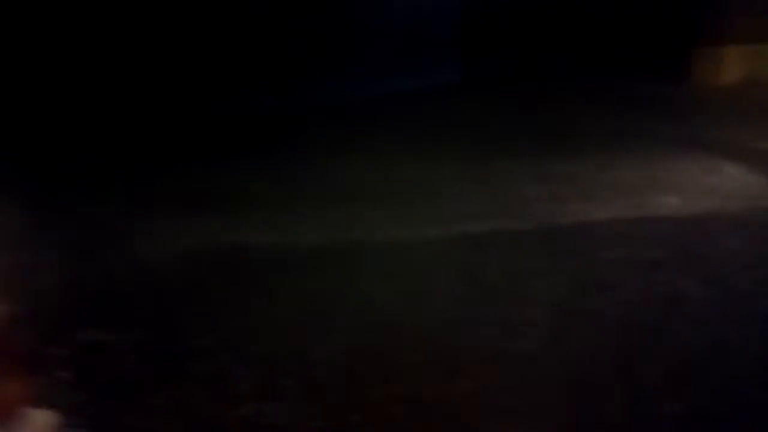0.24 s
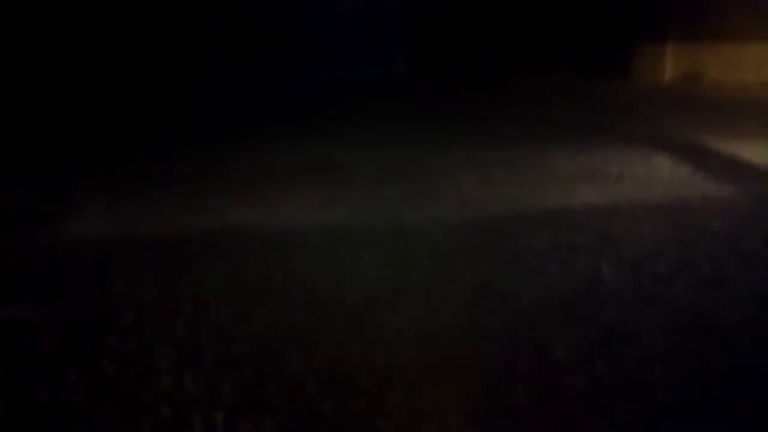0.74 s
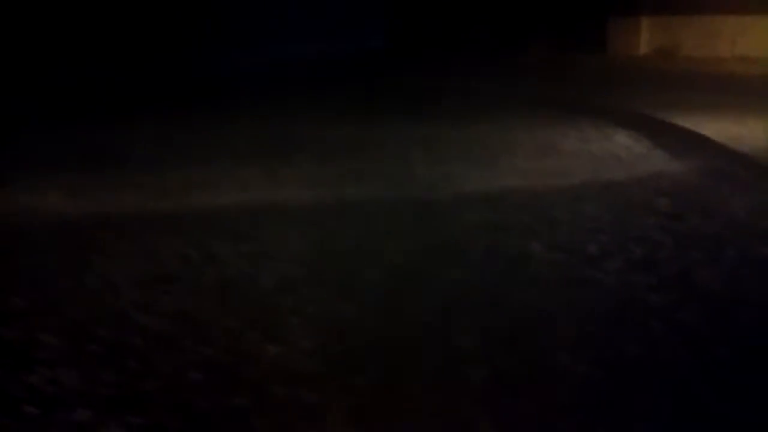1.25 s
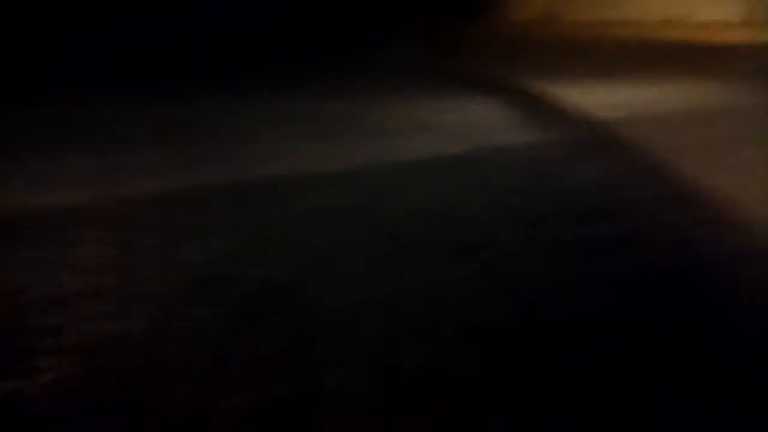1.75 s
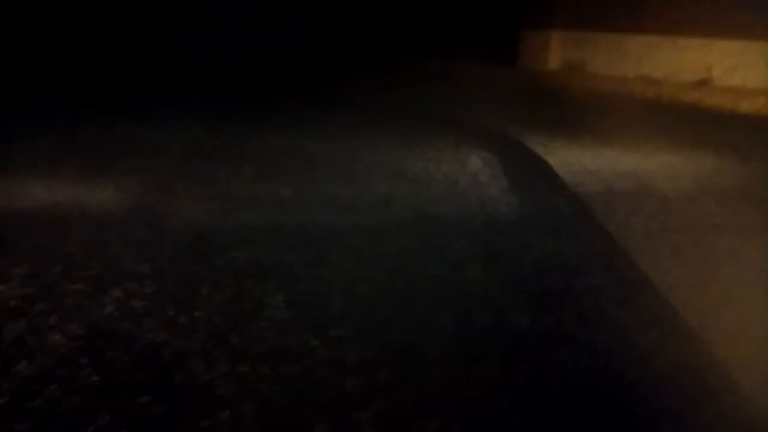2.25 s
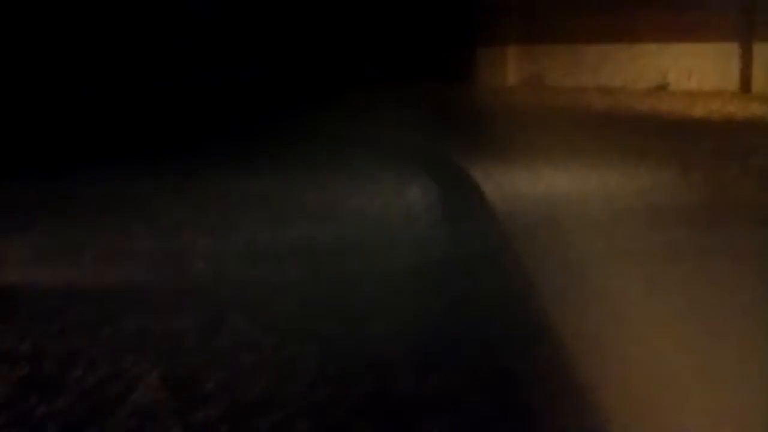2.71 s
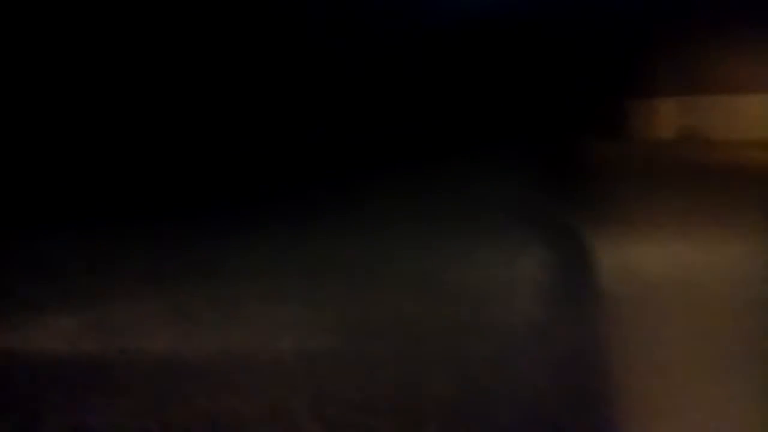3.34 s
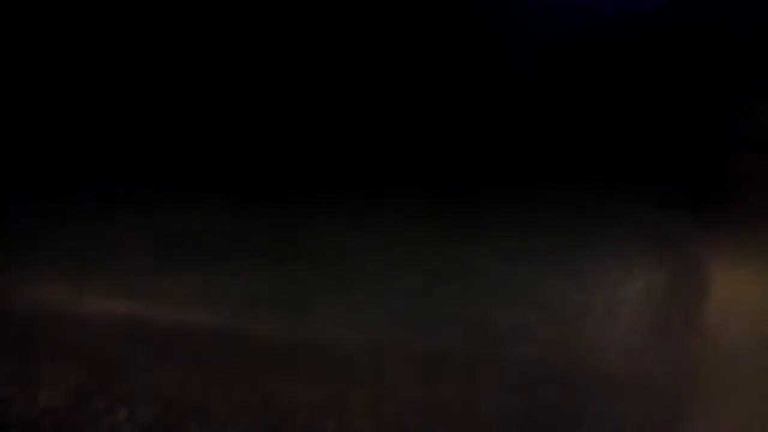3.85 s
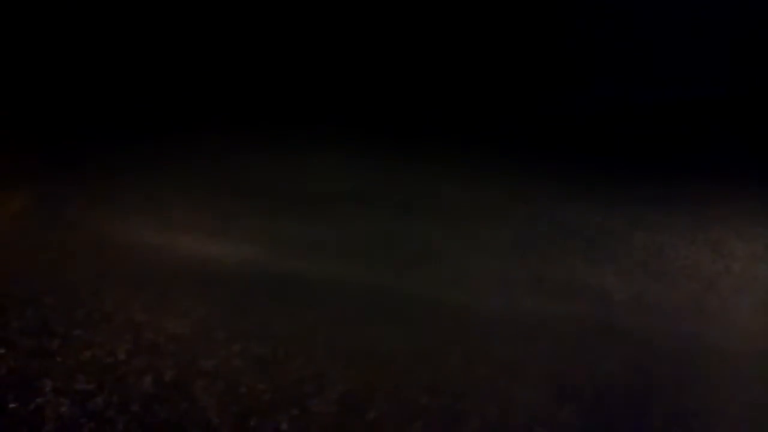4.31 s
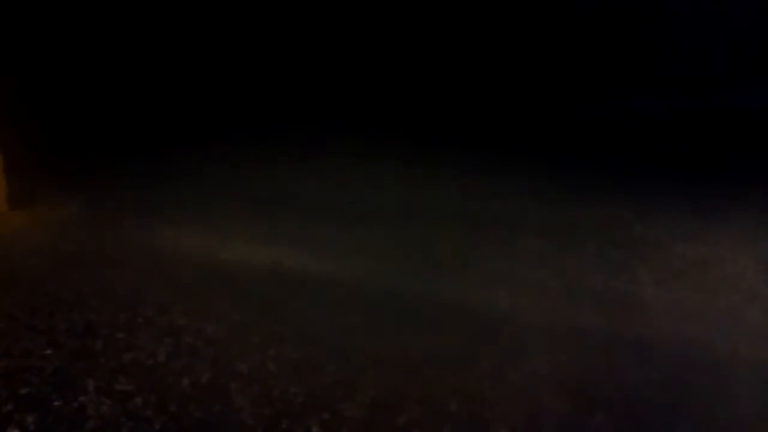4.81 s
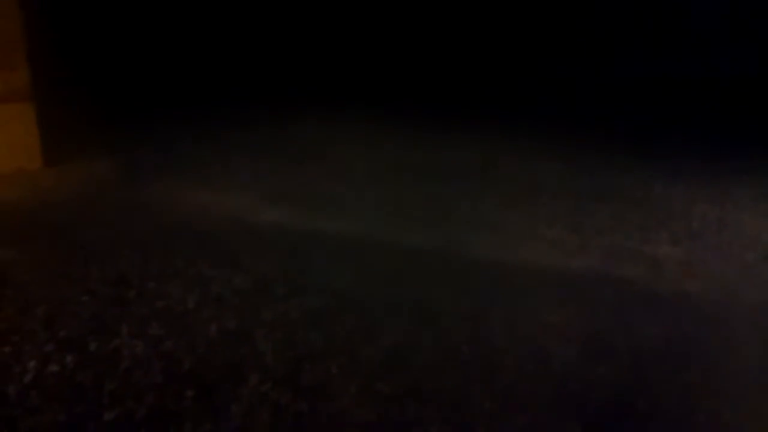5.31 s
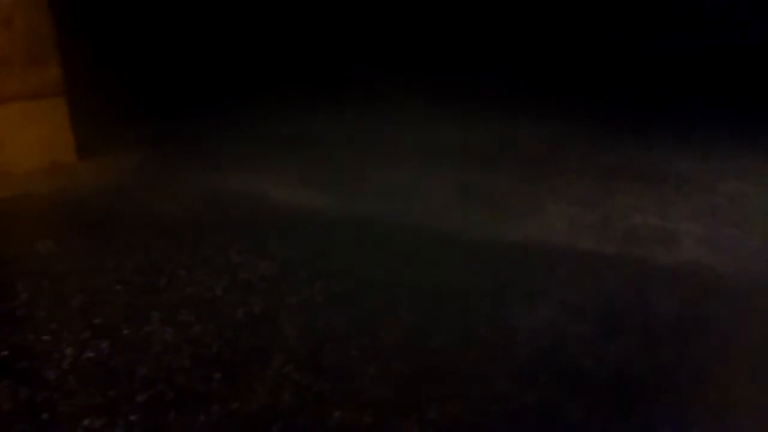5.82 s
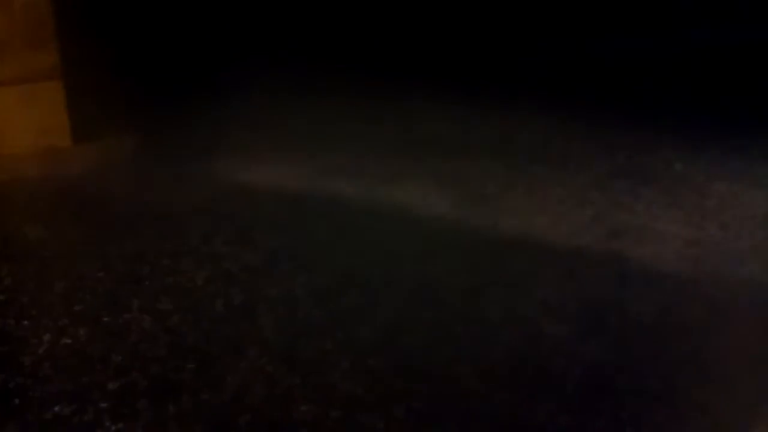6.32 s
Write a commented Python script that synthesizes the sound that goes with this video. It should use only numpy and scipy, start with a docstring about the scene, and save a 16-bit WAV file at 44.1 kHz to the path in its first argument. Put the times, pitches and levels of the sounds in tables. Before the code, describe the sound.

Steady hard hail crackles over a street while a brief gust buffets the microphone, followed by close knocks and small low puffs.

```python
"""Night hail on paving, gust at the microphone

Hail on a paved street: random impacts in five sizes of stone over a wash of noise, with pings and flurries.
A gust buffets the phone's single microphone: shaped noise rumbles, rasps and crackles, single eddies thump.
Throughout the gust, pressure surges choke the microphone for instants; weaker swells of banded noise follow.
A few stones knock close by, as damped modes; late on, a broad band around 3.5 kHz sinks.
"""
import sys
import numpy as np
from scipy import signal
from scipy.fft import rfft, irfft
from scipy.io import wavfile
from scipy.ndimage import uniform_filter1d

SR = 44100
rng = np.random.default_rng(int(sys.argv[2]) if len(sys.argv) > 2 else 0)


def to_wav(sig):
    """Store sig (one row per channel, or 1-D mono) as 16-bit WAV at the path in sys.argv[1].

    Samples outside -1..1 are clipped; the rate is SR.
    """
    pcm = np.clip(np.atleast_2d(sig), -1, 1) * 32767
    pcm = np.round(pcm).astype(np.int16)
    wavfile.write(sys.argv[1], SR, pcm.T)  # frames by channels


N = 289296
TIME = np.arange(N) / SR  # s
FREQ = np.maximum(np.arange(N // 2 + 1) * SR / N, 1)  # Hz

# In the tables, reach is the time from a crest to where it has sunk to 1/e^2.
# Course of the hailfall, which the four sizes of ice scale; the dull patter keeps its own clusters:
# [t/s, level/dB against its usual strength]
HAILFALL = [(0, -2), (.6, -1), (1.15, 1.5), (1.6, .5), (2.15, -2), (2.36, 2), (3.4, 1.6), (4.1, 2),
            (4.7, 4), (5.25, 3), (5.55, -1.7), (5.9, -3.5), (6.56, -1.4)]
# Brief flurries of the four sizes of ice, each in its own measure: [t/s, reach/s, boost/dB]
FLURRIES = [(0.196, 0.089, 2.2), (2.27, 0.3, 1.5), (2.55, 0.22, 1.1), (3.11, 0.14, 2.5), (4.317, 0.12, 1.2),
            (4.85, 0.22, 0.5), (6.12, 0.19, 2), (6.5, 0.12, 1.5)]
# Clusters in the patter of heavy stones; where the boost is 0 it stays steady: [t/s, reach/s, boost/dB]
PATTER_CLUSTERS = [(0, .22, 3), (2.76, 0.032, 6), (3.574, 0.14, 2.5), (4.037, .1, 4), (4.743, 0.25, 4),
                   (5.22, .08, 2.5), (5.796, 0.11, 0), (6.4, 0.61, 2)]
# Clatter, crunch, hiss, spray, before the resonances around:
# [level/dB, share of hailfall/(dB per dB), share of flurry/(dB per dB), drift/(dB per s)]
ICE_SIZES = [(-29, 0.13, 0.14, -0.45), (-31, 0.23, 2, 0.07), (-29.5, 1.02, .55, -0.11),
             (-39.5, 1.2, 0.4, -0.09)]
# Spectrum of heavy stones on the pavement: [f/Hz, relative density/dB per Hz]
PATTER_SPECTRUM = [(60, -44), (130, -6.5), (250, -5), (360, -2.5), (450, -4.5), (680, -5), (980, -1.5),
                   (1280, -3), (1600, -11)]
# Spectrum of ice on the pavement: [f/Hz, relative density/dB per Hz]
ICE_SPECTRUM = [(710, -31), (1200, -4), (1690, -6), (2030, -3.5), (2520, -6), (2780, -4), (3130, -7),
                (3630, -5.5), (3960, -2), (4460, -5.5), (4970, -4.5), (6780, -0.5), (11100, -14),
                (13700, -16), (15700, -24.5)]
# Resonances of the struck surroundings: [f/Hz, full width/Hz, boost/dB before a common trim]
RESONANCES = [(1000, 120, 1), (2210, 550, 1.5), (2780, 150, 2), (3920, 250, 2), (4930, 130, 3)]
# Spectrum of wind rumble at the microphone: [f/Hz, relative density/dB per Hz]
WIND_SPECTRUM = [(15, -55), (25, -21), (141, 3), (257, 1.5), (394, -0.5), (460, -4.5), (537, -4),
                 (882, -15), (1140, -20), (1500, -37), (1950, -58), (3300, -120)]
# Blasts of the gust on the port: [start t/s, hold/s, rumble level/dB, rasp level/dB before a small lift]
GUST_BLASTS = [(0.758, .008, -28.5, -56), (0.886, .006, -24.5, -46), (0.939, 0.046, -18.5, -42),
               (1.005, .02, -25, -49), (1.048, 0.093, -17, -40), (1.177, 0.022, -14, -30),
               (1.285, 0.014, -18, -37), (1.352, 0.011, -20.5, -24), (1.46, 0.034, -15.5, -20),
               (1.532, 0.053, -20.5, -29.5), (1.632, 0.032, -27, -31)]
# Weaker puffs, and at 3.51 s a dull swell, probably of patter: [t/s, reach/s, level/dB, centre f/Hz]
LOW_SWELLS = [(1.972, 0.023, -28, 180), (2.01, 0.013, -25.5, 115), (2.293, .03, -40, 80),
              (2.68, .07, -52, 70), (2.913, 0.049, -44, 125), (3.511, 0.063, -32.5, 366),
              (3.598, 0.017, -24, 258), (3.65, 0.034, -28.5, 165), (3.938, 0.024, -31, 115),
              (4.708, 0.034, -31, 190), (4.788, 0.061, -37, 151)]
# Single eddies that thump the port: [t/s, peak level/dB, f/Hz]
EDDIES = [(.75, -15.5, 245), (.777, -9.5, 272), (.894, -6, 252), (0.963, -7, 278), (.968, -5, 330),
          (1.009, -7, 258), (1.036, -10, 260), (1.053, -2.5, 380), (1.153, -4.5, 330), (1.178, -4, 300),
          (1.198, -1, 640), (1.232, -1, 200), (1.247, -1.5, 352), (1.284, -0.5, 190), (1.302, -1, 383),
          (1.309, -5, 302)]
# Pressure surges that pin the membrane: [t/s, length at half depth/s, depth/dB]
PRESSURE_SURGES = [(0.758, .0086, 5.5), (.909, 0.0047, 23), (.986, .02, 34), (1.042, .009, 25.5),
                   (1.186, .0039, 20), (1.209, 0.0093, 18.5), (1.223, 0.019, 5.5), (1.517, .0092, 19.5),
                   (1.594, 0.0058, 13)]
# Stones landing close by: [t/s, relative level/dB, f/Hz, time to decay by 60 dB/s]
CLOSE_STONES = [(1.344, -3, 1060, 0.006), (1.819, 2.5, 1590, 0.0013), (1.8325, -20, 1500, .006),
                (1.839, -5, 1490, 0.0045), (1.867, -17, 1510, .0087)]

PATTER_DB = -42  # before its clusters
PELLETS_DB = -43  # at the usual strength of the hailfall
# a nearby surface rattles, then recedes
RATTLE_DB, RATTLE_UNTIL_S, RATTLE_FADE_S = -27.5, 0.12, 0.4
BLAST_ATTACK_S, BLAST_RELEASE_S = 0.02, 0.063
RASP_ATTACK_S, RASP_RELEASE_S = 0.014, 0.027
# crackle level against the rumble, its delay and smoothing
CRACKLE_DB, CRACKLE_LAG_S, CRACKLE_SMOOTH_S = -21.5, 0.12, .25
# light air at the port freshens until it holds steady
BREEZE_DB, BREEZE_RISE_DB_PER_S, BREEZE_STEADY_S = -46, 2.5, 5.9
SWELL_WIDTH = 1.7  # ratio of band edge to centre
KNOCK_SCATTER_DB = -28
# width: ratio of band edge to centre
HOLLOW_FROM_S, HOLLOW_DB_PER_S, HOLLOW_HZ, HOLLOW_WIDTH = 5.2, 2.2, 3500, 1.35
TOP_HZ = 15800


def undb(db):
    """Decibels to gain."""
    return 10 ** (np.asarray(db) / 20)


def unit(x):
    """Scale to rms 1."""
    return x / np.sqrt(np.mean(x ** 2))


def colour(x, points):
    """Filter by a spectrum of (Hz, dB) points, joined along log frequency."""
    hz, db = np.transpose(points)
    gain_db = np.interp(np.log(FREQ), np.log(hz), db)
    return irfft(rfft(x) * undb(gain_db), N)


def band(x, low_hz, high_hz, order=8):
    """Band-pass with smooth edges and no delay."""
    low_edge = 1 + (low_hz / FREQ) ** (2 * order)
    high_edge = 1 + (FREQ / high_hz) ** (2 * order)
    return irfft(rfft(x) / np.sqrt(low_edge * high_edge), N)


def noise():
    """White noise for the whole length."""
    return rng.standard_normal(N)


def walk(rate):
    """Slow chance with spread 1, changing up to about rate times a second."""
    return unit(irfft(rfft(noise()) * (FREQ > 1.5) / (1 + (FREQ / rate) ** 2), N))


def bump(s, reach):
    """A smooth rise and fall centred on a moment."""
    return np.exp(-2 * ((TIME - s) / reach) ** 2)


def envelope(start, hold, attack_s, release_s):
    """Rounded attack, hold, exponential release."""
    early = np.maximum(start - TIME, 0)
    late = np.maximum(TIME - start - hold, 0)
    return np.exp(-(early / attack_s) ** 2 - late / release_s)


def impacts(rate, spread_db, ring_s):
    """Stones land at random with unequal force; each gives a click and a decaying burst of noise."""
    chance, size, sign = rng.random(N), rng.exponential(size=N), noise()
    blows = (chance < rate / SR) * undb(spread_db * np.minimum(size, 5))
    energy = signal.lfilter([1], [1, -np.exp(-2 / (ring_s * SR))], blows ** 2)
    clicks = unit(blows * np.sign(sign))
    bursts = unit(np.sqrt(energy) * noise())
    return unit(clicks + bursts)


def pings(rate, low_hz, high_hz, cycles, spread_db):
    """Struck things ring: each swells and dies within some cycles of its own random pitch."""
    out, t = np.zeros(N + SR // 10), np.arange(SR // 10) / SR
    for when, pitch, size, damping in rng.random((int(rate * N / SR), 4)):
        hz = low_hz * (high_hz / low_hz) ** pitch
        start = int(when * N)
        age = t * hz / (cycles * (.5 + damping))
        ring = np.sin(2 * np.pi * hz * t) * age * np.exp(-age)
        # a few are much louder than the rest
        out[start:start + len(t)] += ring * undb(-abs(spread_db) * np.log(.02 + size))
    return unit(out[:N])


def stones(spectrum, low_hz, high_hz, own, cracks, wash_db, flicker_db):
    """One size of stone: its own near impacts, cracks shared by all sizes, and the wash of far hail."""
    x = own + cracks + undb(wash_db) * noise()
    shaped = unit(band(colour(x, spectrum), low_hz, high_hz, order=12))
    return shaped * undb(flicker_db * walk(17))


def rattle():
    """A nearby surface under the hail: impacts in a narrow band, dying away as it recedes."""
    struck = unit(band(impacts(rate=700, spread_db=1.5, ring_s=0.0095), 2100, 2100, order=4))
    receding = np.exp(-np.maximum(TIME - RATTLE_UNTIL_S, 0) / RATTLE_FADE_S)
    return struck * undb(RATTLE_DB) * receding


def hail():
    """Four sizes of ice follow hailfall and flurries in their own measure; the dull patter follows clusters."""
    flutter = undb(0.18 * walk(16))  # common to all sizes
    sharp = impacts(rate=1500, spread_db=1.5, ring_s=0.0018)

    patter = flutter * stones(
        PATTER_SPECTRUM, 60, 1230, impacts(rate=900, spread_db=2.0, ring_s=0.006),
        cracks=undb(-5.5) * sharp, wash_db=2.0, flicker_db=1.3)
    clatter = flutter * stones(
        ICE_SPECTRUM, 1330, 3585, impacts(rate=1300, spread_db=2.5, ring_s=0.0077),
        cracks=undb(-2.5) * sharp, wash_db=0.0, flicker_db=0.91)
    crunch = flutter * stones(
        ICE_SPECTRUM, 4220, 6210, impacts(rate=1800, spread_db=3.5, ring_s=0.0044),
        cracks=undb(-0.5) * sharp, wash_db=2.0, flicker_db=0.98)
    hiss = flutter * stones(
        ICE_SPECTRUM, 6000, 8450, impacts(rate=1200, spread_db=-1.0, ring_s=0.0024),
        cracks=undb(-5) * sharp, wash_db=2.5, flicker_db=0.74)
    spray = flutter * stones(
        ICE_SPECTRUM, 9010, 17000, impacts(rate=2500, spread_db=1.5, ring_s=0.00092),
        cracks=undb(-9.0) * sharp, wash_db=0.0, flicker_db=0.03)

    # hollow things ring among the impacts
    low_pings = pings(rate=110, low_hz=300, high_hz=1285, cycles=4.6, spread_db=3.0)
    mid_pings = pings(rate=150, low_hz=1579, high_hz=3134, cycles=9.3, spread_db=3.0)
    high_pings = pings(rate=300, low_hz=6010, high_hz=7940, cycles=8.7, spread_db=1.5)
    patter = undb(2.5) * patter + undb(-2) * low_pings
    clatter = undb(-1.14) * clatter + undb(-7.5) * mid_pings
    hiss = undb(-1.0) * hiss + undb(-8) * high_pings

    fall_db = np.interp(TIME, *np.transpose(HAILFALL))
    flurry_db = sum(db * bump(s, reach) for s, reach, db in FLURRIES)
    cluster_db = sum(db * bump(s, reach) for s, reach, db in PATTER_CLUSTERS)
    ice = np.zeros(N)
    for x, (db, by_fall, by_flurry, drift) in zip([clatter, crunch, hiss, spray], ICE_SIZES):
        ice += x * undb(db + by_fall * fall_db + by_flurry * flurry_db + drift * TIME)

    # single pellets tick on the ground nearby
    ticks = pings(rate=70, low_hz=3450, high_hz=9650, cycles=2.4, spread_db=2.5)
    pellets = ticks * undb(PELLETS_DB + fall_db)
    return ice + pellets + patter * undb(PATTER_DB + cluster_db) + rattle()


def surroundings(x):
    """Hollow things under the hail favour a few bands."""
    boost_db = sum(db / (1 + (2 * (FREQ - hz) / width) ** 2) for hz, width, db in RESONANCES)
    return irfft(rfft(x) * undb(boost_db - 0.66), N)


def breeze():
    """Light air stirs low noise at the port, freshening steadily and then holding."""
    stir = unit(band(noise(), 68, 286, order=3)) * undb(2.8 * walk(4.7))
    return stir * undb(BREEZE_DB - BREEZE_RISE_DB_PER_S * np.maximum(BREEZE_STEADY_S - TIME, 0))


def gust():
    """Turbulence rumbles at the port and tears across its edge; the membrane crackles under sustained wind."""
    rumble = unit(colour(noise(), WIND_SPECTRUM)) * undb(2.14 * walk(46))
    rasp = unit(band(impacts(rate=1000, spread_db=2.0, ring_s=0.00088), 380, 1830, order=2)) * undb(0.5)
    crackle = unit(band(impacts(rate=220, spread_db=3.0, ring_s=0.0024), 9100, 14700))
    # where blasts overlap, the strongest counts
    blow = np.max([undb(db) * envelope(s, hold, BLAST_ATTACK_S, BLAST_RELEASE_S)
                   for s, hold, db, _ in GUST_BLASTS], axis=0)
    tear = np.max([undb(db) * envelope(s, hold, RASP_ATTACK_S, RASP_RELEASE_S)
                   for s, hold, _, db in GUST_BLASTS], axis=0)
    sustained = uniform_filter1d(blow, int(CRACKLE_SMOOTH_S * SR))
    strain = np.interp(TIME - CRACKLE_LAG_S, TIME, sustained)
    return rumble * blow + rasp * tear + crackle * undb(CRACKLE_DB) * strain


def thumps():
    """Each eddy is one dip in pressure with a rebound on both sides."""
    out = np.zeros(N)
    for s, db, hz in EDDIES:
        near = abs(TIME - s) < 4 / hz
        u = (np.pi * hz * (TIME[near] - s)) ** 2
        out[near] -= undb(db) * (1 - 2 * u) * np.exp(-u)
    return out


def choke():
    """While a surge holds the membrane at its stop, less sound gets through: gain over time."""
    db = sum(depth / (1 + (2 * (TIME - s) / length) ** 8) for s, length, depth in PRESSURE_SURGES)
    return undb(-db)


def knocks():
    """A close stone rings one heavily damped mode, with a faint, longer scatter of noise."""
    out, t = np.zeros(N), np.arange(SR // 10) / SR
    for s, db, hz, ring in CLOSE_STONES:
        mode = np.sin(2 * np.pi * hz * t) * np.exp(-np.log(1000) * t / ring)
        scatter = unit(band(noise(), 1000, 1900, order=3))[:len(t)] * np.exp(-t / .025)
        start = int(s * SR)
        out[start:start + len(t)] += undb(db) * (undb(4.5) * mode + undb(KNOCK_SCATTER_DB) * scatter)
    return band(out, 700, 2500, order=3)


def low_swells():
    """Small puffs at the port, and one dull swell, probably of patter: noise swelling in a band of its own."""
    out = np.zeros(N)
    for s, reach, db, hz in LOW_SWELLS:
        swell = unit(band(noise(), hz / SWELL_WIDTH, hz * SWELL_WIDTH, order=4))
        out += undb(db) * swell * bump(s, reach)
    return out


def hollow(x):
    """Late on, a broad band around 3.5 kHz, across upper clatter and lower crunch, sinks steadily."""
    sunk_db = HOLLOW_DB_PER_S * np.maximum(TIME - HOLLOW_FROM_S, 0)
    sinking = band(x, HOLLOW_HZ / HOLLOW_WIDTH, HOLLOW_HZ * HOLLOW_WIDTH, order=20)
    return x - (1 - undb(-sunk_db)) * sinking


def scene():
    """Street, wind and close stones reach one microphone, heard alike in both ears."""
    street = hollow(surroundings(hail()))
    # the thumps themselves are not choked
    sound = (street + breeze() + gust() + knocks() + low_swells()) * choke() + thumps()
    return np.array([sound, sound])


def record(dry):
    """The phone sheds the deepest rumble, rounds peaks near full scale and cuts the top."""
    lean = band(dry, 34, SR, order=3)
    rounded = lean / (1 + lean ** 8) ** (1 / 8)
    top_cut = signal.ellip(12, .1, 80, TOP_HZ, fs=SR, output="sos")
    return signal.sosfilt(top_cut, rounded)


dry = scene()
out = record(dry)
to_wav(out)
```